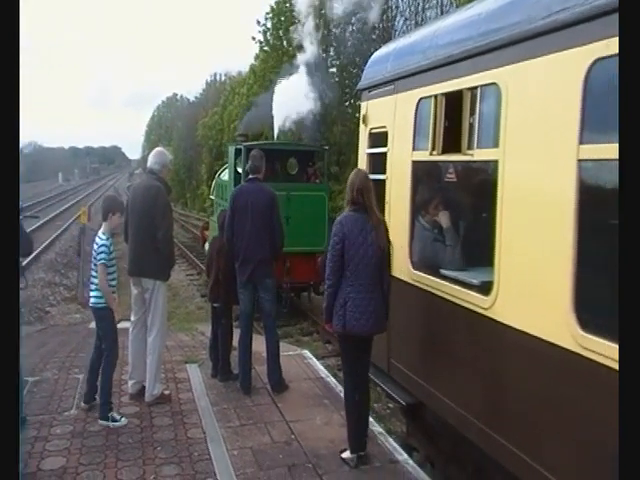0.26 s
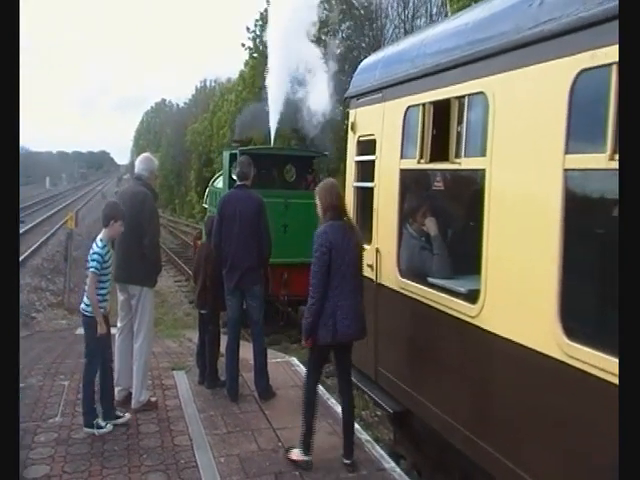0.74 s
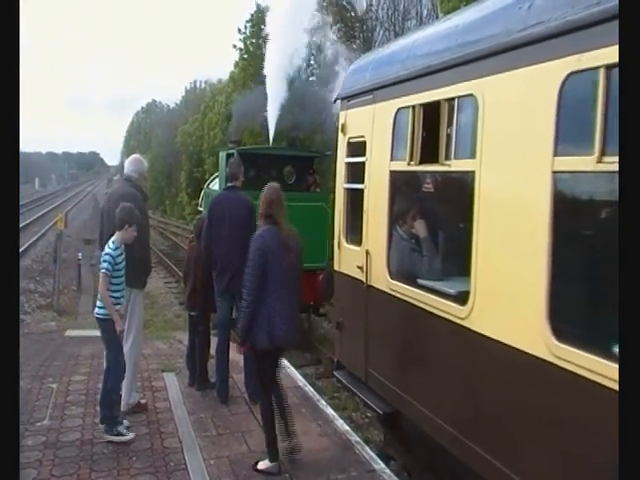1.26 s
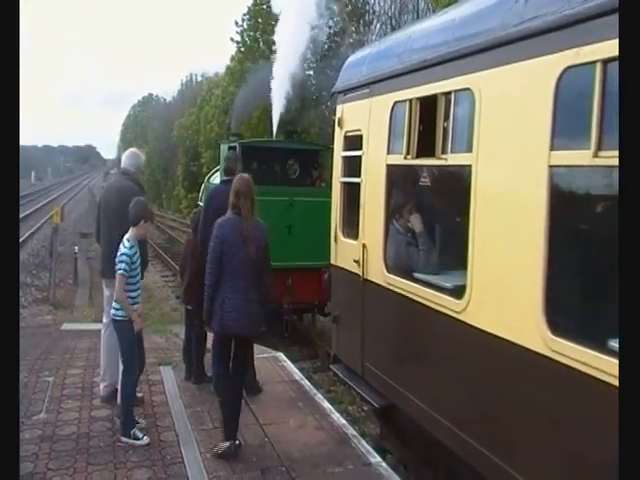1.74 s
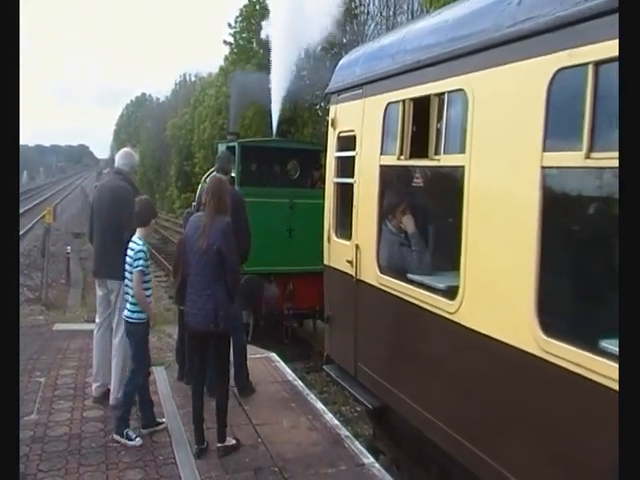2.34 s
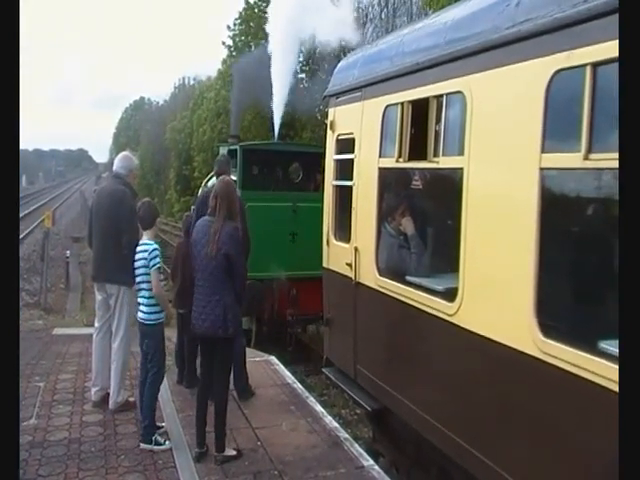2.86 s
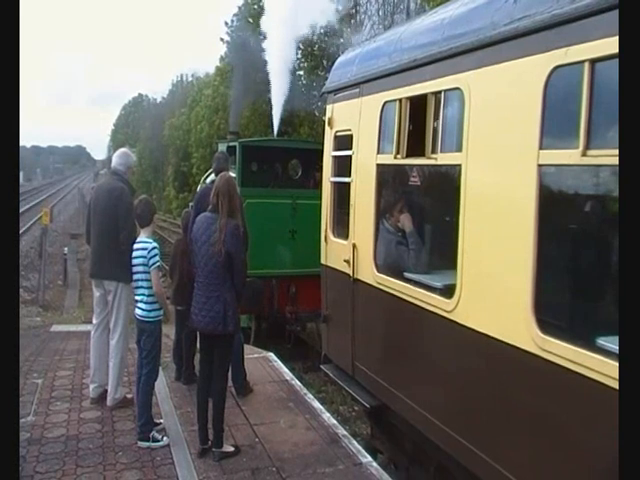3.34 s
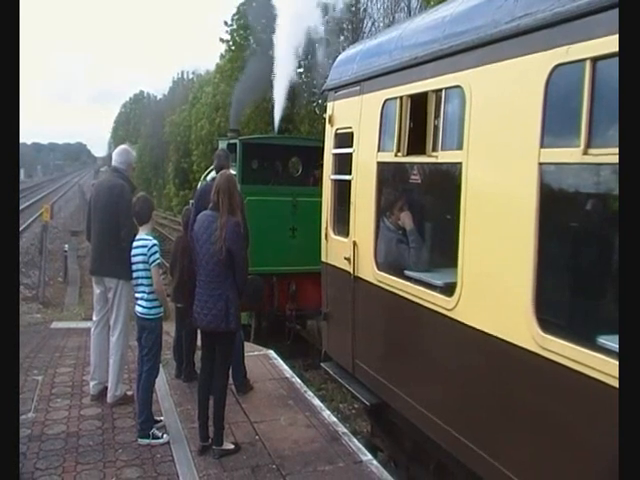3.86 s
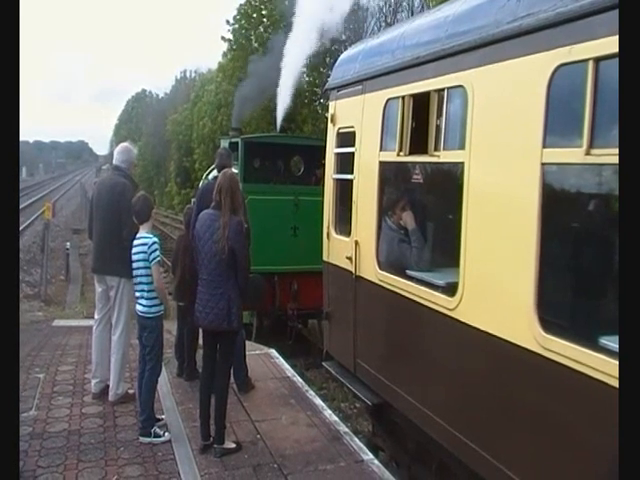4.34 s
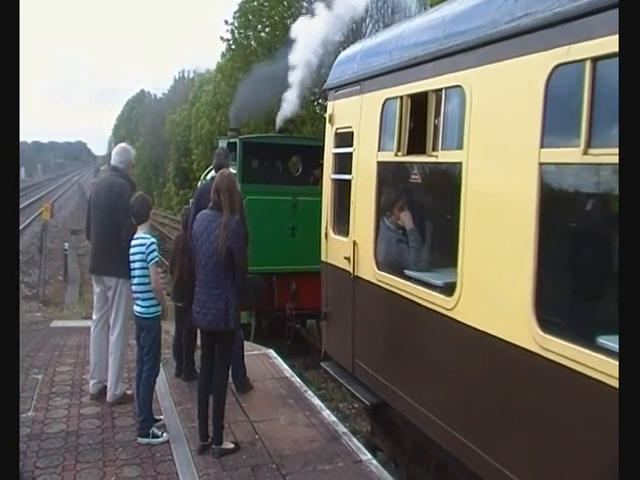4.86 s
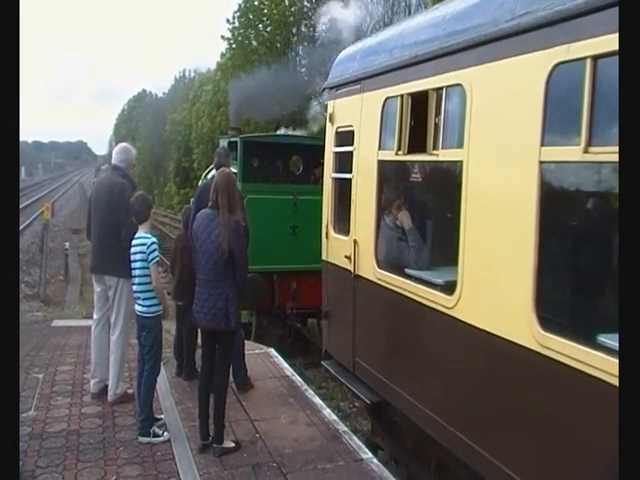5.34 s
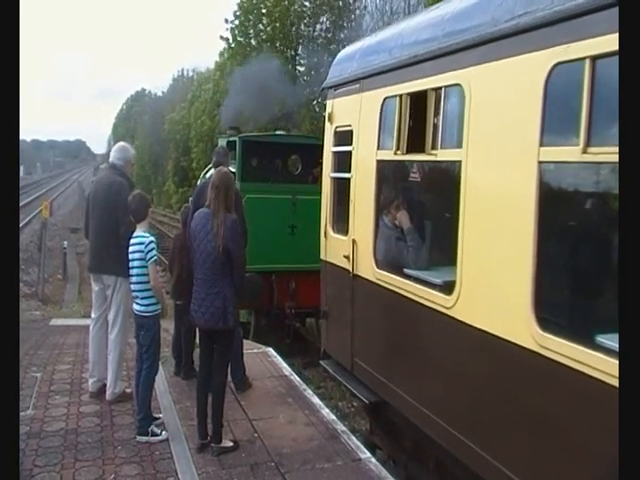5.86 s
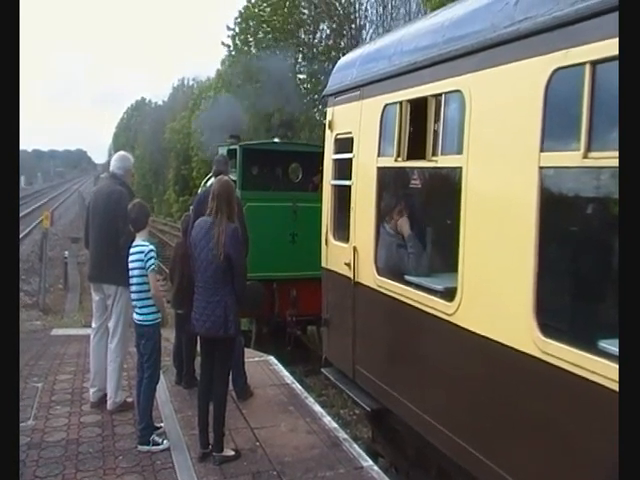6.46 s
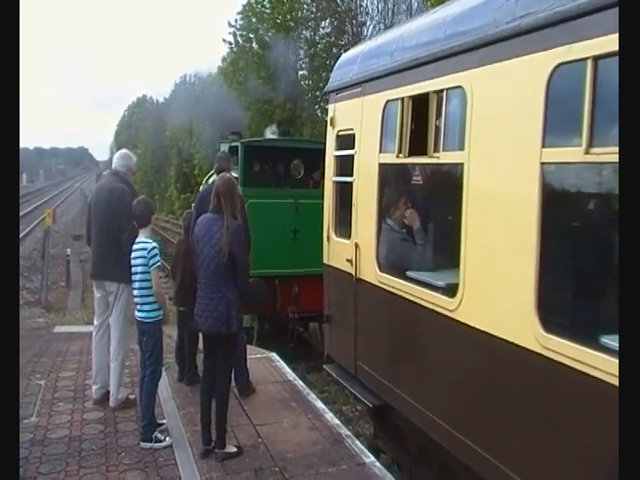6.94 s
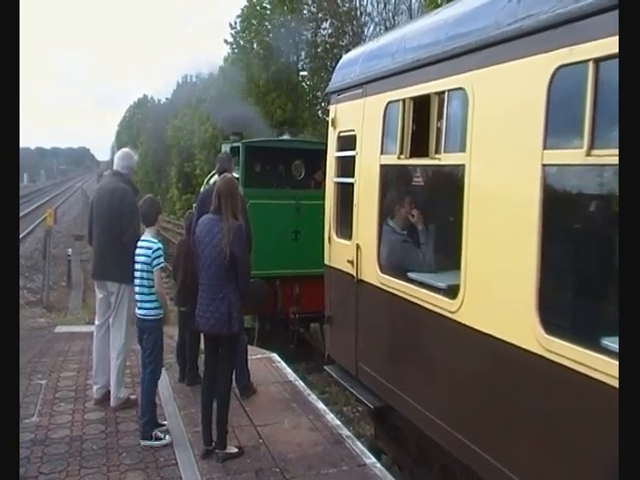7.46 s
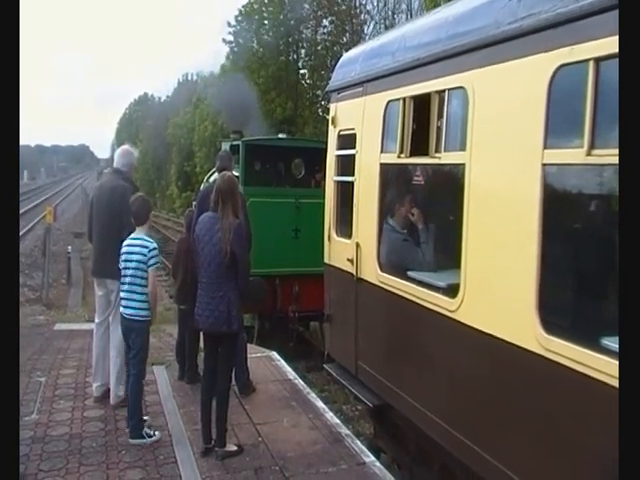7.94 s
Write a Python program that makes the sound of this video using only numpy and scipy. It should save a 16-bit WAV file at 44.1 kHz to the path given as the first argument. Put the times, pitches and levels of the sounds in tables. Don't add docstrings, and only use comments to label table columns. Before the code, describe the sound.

Loud steam escape hisses and sings for five seconds, cuts off with heavy low thumps, then deep rumbling, gusty wind and a faint leak hiss.

```python
import sys
import numpy as np
from scipy import signal
from scipy.io import wavfile
from scipy.ndimage import uniform_filter1d, map_coordinates

SR = 44100
rng = np.random.default_rng(int(sys.argv[2]) if len(sys.argv) > 2 else 0)


def boost_factor(decibels):
    exponent = np.asarray(decibels, float) / 20
    return 10 ** exponent


def dump_mix(stems):
    frames = np.atleast_2d(stems).T
    limited = np.clip(frames, -1, 1)
    pcm = np.round(limited * 32767).astype(np.int16)
    wavfile.write(sys.argv[1], SR, pcm)


N = 361163
TIME_S = np.arange(N) / SR
TREBLE_EDGES_HZ = 200 * 2 ** (np.arange(25) / 4)
RUSTLE_EDGES_HZ = 140 * 2 ** (np.arange(12) / 4)
BASS_EDGES_HZ = 11 * 2 ** (np.arange(16) / 3)


def rms_one(x):
    return x / np.sqrt(np.mean(x ** 2) + 1e-20)


def in_time(rows):
    s, *columns = np.transpose(rows)
    return [np.interp(TIME_S, s, column) for column in columns]


def at_hz(points, hz):
    point_hz, point_db = np.transpose(points)
    return np.interp(np.log(hz), np.log(point_hz), point_db)


def above(hz, edge_hz, octaves):
    return 1 / (1 + (edge_hz / hz) ** (4 / octaves))


def drift(rate):
    r = np.exp(-80 * np.pi * rate / SR)
    slow = signal.lfilter([1], [1, -2 * r, r * r], rng.standard_normal(N // 40 + 2002))
    slow = rms_one(slow[2000:])
    return np.interp(np.arange(N) / 40, np.arange(len(slow)), slow)


def late(x, lag_s):
    return map_coordinates(x, [np.arange(N) - lag_s * SR], order=3)


def wavering(hz, wander, rate):
    wandering_hz = hz * (1 + wander * drift(rate))
    return np.sqrt(2) * np.sin(2 * np.pi * np.cumsum(wandering_hz) / SR)


def narrow_noise(hz, width_hz):
    phase = 2 * np.pi * np.cumsum(hz * np.ones(N)) / SR
    return rms_one(drift(width_hz) * np.cos(phase) + drift(width_hz) * np.sin(phase))


def resonant_noise(hz, width_hz):
    band = signal.butter(2, [hz - width_hz / 2, hz + width_hz / 2], "band", fs=SR, output="sos")
    return rms_one(signal.sosfilt(band, rng.standard_normal(N)))


def ring(events, hz, t60):
    clicks = np.full(N, 1e-18)
    for s, level_db in events:
        clicks[round(s * SR)] = boost_factor(level_db)
    r, w = boost_factor(-60 / (t60 * SR)), 2 * np.pi * hz / SR
    return signal.lfilter([0, np.sin(w)], [1, -2 * r * np.cos(w), r * r], clicks)


def turbulence(mid_shape, side_shape, edges, moves, side_db, shared_db, slow_db, fast_db):
    mid_sum, side_sum = 0, 0
    white = rng.standard_normal((2, 2, N))
    together, near = drift(7.6), drift(3.3)
    for k, (low, high) in enumerate(zip(edges, edges[1:])):
        band = signal.butter(2, [low, high], "band", fs=SR, output="sos")
        mid, side = signal.sosfilt(band, white[k % 2])
        hz = np.sqrt(low * high)
        before, near = near, drift(1.64)
        flicker_db = shared_db * together + slow_db * (before + near) + fast_db * drift(38)
        flicker = boost_factor(moves(hz) + flicker_db)
        mid_sum = mid_sum + boost_factor(at_hz(mid_shape, hz)) * flicker * mid
        side_sum = side_sum + boost_factor(at_hz(side_shape, hz) + side_db) * flicker * side
    return np.array([mid_sum, side_sum]) / np.std(mid_sum)


# start_s, depth_db
DUCKS = [(5.02, 2), (5.115, 1), (5.5, 2), (5.77, 4.5), (5.95, -2), (6.5, -1.5), (6.85, 5.5), (6.93, 0)]


def ducking():
    attack_s, release_s = .045, .1
    dips_db = 0
    for s, depth_db in DUCKS:
        fall = np.clip((TIME_S - s) / attack_s + 1, 0, 1)
        dips_db = dips_db + depth_db * fall * np.exp(-np.maximum(TIME_S - s, 0) / release_s)
    return -dips_db


# pitch_hz, level_db (per Hz)
JET_MID = [(300, -41), (700, -41.5), (1200, -12.5), (1600, -7.5), (2000, -7.5), (3000, -5.5), (3800, 7),
           (4500, -4.5), (5200, 1.5), (5800, -6), (7000, -7.5), (9500, -13), (11000, -3.5), (12500, -28)]
JET_SIDE = [(300, -39.5), (700, -24.5), (1200, -13.5), (1600, -11), (2000, -12.5), (3000, -7), (3800, 3),
            (4500, -8.5), (5200, 4), (5800, 1), (7000, -0.5), (9500, -11), (11000, -12), (12500, -13)]


def jet(flow_db, lift_db):
    sizzle_db = -5 + lift_db
    roar_db = -11 + drift(14.0)

    def moves(hz):
        top = above(hz, 6840, 0.48) + 0.27 * above(hz, 12900, 0.8)
        return (sizzle_db + 9.5) * top + (roar_db + 12.0) * (1 - above(hz, 2350, 0.38))

    noise = turbulence(JET_MID, JET_SIDE, TREBLE_EDGES_HZ, moves, side_db=-8.0, shared_db=1.23,
                       slow_db=0.1, fast_db=0.86)
    return boost_factor(flow_db - 3.0 + ducking()) * noise


# start_s, pitch_hz, level_db
WHISTLE = [(0, 2500, -80), (.5, 2760, -30), (.72, 3200, -30), (.92, 3230, -22), (1.1, 3250, -15),
           (1.3, 3106, -23), (1.6, 2984, -29), (2.05, 2862, -24.5), (2.27, 2950, -42), (2.31, 3070, -16.5),
           (2.36, 3235, -17), (2.52, 3315, -16.5), (3.08, 3126, -23), (3.3, 2880, -27), (4.06, 2930, -25),
           (4.3, 2765, -26.5), (4.88, 2800, -29), (5.0, 2770, -99)]
# start_s, pitch_hz, level_db
OPENING = [(0, 4210, -27), (.13, 4220, -27), (.3, 4490, -39), (.45, 4140, -90)]
# start_s, pitch_hz, level_db
UPPER = [(.1, 5000, -87), (.25, 5020, -28.5), (.55, 4760, -38), (.8, 4520, -32), (1.0, 4500, -60),
         (2.5, 4600, -46), (3.2, 4600, -35), (4.1, 4560, -36), (4.8, 4600, -37), (5.0, 4600, -87)]


def whistle():
    pitch_hz, level_db = in_time(WHISTLE)
    broken = np.clip((3050 - pitch_hz) / 150, 0, 1)   # share, rising over 150 Hz below 3050 Hz
    wander = .011 + .035 * broken
    clear = wavering(pitch_hz, wander, rate=60.6)
    breathy = narrow_noise(pitch_hz, width_hz=70)
    tone = boost_factor(level_db - 4.5) * (0.75 * clear + 0.4 * breathy)
    for strand_hz, strand_db in (in_time(OPENING), in_time(UPPER)):
        tone += boost_factor(strand_db - 1.0) * narrow_noise(strand_hz, width_hz=70)
    return tone * boost_factor([[0], [-12.0]])


# pitch_hz, width_hz, level_db
COLUMN = [(1831, 155, -8), (2375, 177, -4), (2900, 270, 1.5), (4600, 2300, 2)]


def howl(flow_db, lift_db):
    from_s, rise_db_per_s = 0.53, 50
    until_s, fall_db_per_s = 4.89, 38
    level_db = flow_db - 7.5 - 0.97 * lift_db
    level_db = level_db - rise_db_per_s * np.maximum(from_s - TIME_S, 0)
    level_db = level_db - fall_db_per_s * np.maximum(TIME_S - until_s, 0)
    modes = sum(boost_factor(mode_db + 1.24 * drift(13.5)) * resonant_noise(hz, width_hz)
                for hz, width_hz, mode_db in COLUMN)
    return boost_factor(level_db - 7.0) * modes * boost_factor([[0], [-15.0]])


# start_s, flow_db, lift_db (lift of the disc as extra sizzle)
VALVE = [(0, -17.5, -6), (.33, -17, -5), (.45, -17.5, -1), (.7, -17.5, 3.5), (1.2, -20, 1.5),
         (1.55, -17.5, -0.5), (2.2, -17, -1), (2.4, -19.5, 2.5), (3.86, -17.5, 1.5), (3.98, -20.5, -0.5),
         (4.05, -17.5, 0.5), (4.6, -19.5, -3), (4.85, -18.5, -4), (4.93, -22, -3), (5.08, -28, -7),
         (5.17, -29.5, -3), (5.27, -51, 4), (5.5, -59, 7)]
# start_s, delay_ms
ECHO = [(0, 2.3), (.35, 2.25), (.6, 1.96)]


def valve():
    flow_db, lift_db = in_time(VALVE)
    steam = jet(flow_db, lift_db) + whistle() + howl(flow_db, lift_db)
    dull = signal.sosfilt(signal.butter(2, 3400, fs=SR, output="sos"), steam[0])
    delay_s = in_time(ECHO)[0] / 1000
    steam[0] -= boost_factor(-16.5) * late(dull, delay_s)
    return steam


# pitch_hz, level_db (per Hz)
LEAK_MID = [(250, -15.5), (400, -5), (700, -4), (1100, 0.5), (1800, -8), (3000, -15), (4500, -14.5),
            (6000, -24.5), (8000, -23.5), (10000, -25.5), (12500, -29.5)]
LEAK_SIDE = [(250, -14), (400, 0.5), (700, 0.5), (1100, 7.5), (1800, 4), (3000, -1), (4500, -3.5),
             (6000, -4), (8000, -6), (10000, -12), (12500, -12)]
# start_s, level_db
PUFFS = [(5.17, 5), (5.66, 8), (6.2, 2), (6.6, 4), (6.98, 9.5), (7.25, 7.5), (7.53, 6), (7.8, 11),
         (8.1, 7.5)]


def leak():
    level_db = -43.5 + ducking()
    puff_s = 0.08
    top_db = -6.5 + sum(puff_db * np.exp(-((TIME_S - s) / puff_s) ** 2) for s, puff_db in PUFFS)

    def moves(hz):
        return (level_db + 48.0) * above(hz, 1400, 2.1) + (top_db + 16.0) * above(hz, 6300, 1.67)

    hiss = turbulence(LEAK_MID, LEAK_SIDE, TREBLE_EDGES_HZ, moves, side_db=-19.0, shared_db=.5,
                      slow_db=0.13, fast_db=1.0)
    thin_whistle = boost_factor(level_db - 8.5) * narrow_noise(3230, width_hz=110)
    return boost_factor(-39.5) * hiss + thin_whistle * boost_factor([[0], [-8.0]])


# start_s, draught_db (as drum level), second_db (second mode re drum)
DRUM = [(0, -28.5, 4.5), (.4, -31, -0.5), (.95, -36, 9), (1.2, -40.5, -4.5), (1.7, -24.5, -11),
        (2.0, -24, -6.5), (2.5, -38, -8), (3.4, -28, -15), (4.25, -32.5, 3), (4.45, -23.5, -5.5),
        (4.75, -33, 0), (5.1, -18, 1.5), (5.45, -16.5, -5), (6.05, -10.5, -13), (6.85, -12, -5.5),
        (7.05, -15, 2), (7.6, -21.5, -3), (8.19, -32.5, 6.5)]
# start_s, level_db
FLUE_OVERTONE = [(5.0, -77), (6.2, -42), (6.7, -46), (8.19, -52)]


def fire():
    drum_db, second_db = in_time(DRUM)
    pitch_hz = 39.8 - .06 * np.maximum(drum_db + 30, 0)
    boom_db = drum_db + second_db + 2.5 * drift(5.0)
    drum_db = drum_db + 0.21 * np.clip(-6 - drum_db, 0, 15) * drift(5.0)
    drum = boost_factor(drum_db + 0.76 * drift(3.4)) * wavering(pitch_hz, wander=0.0174, rate=3.3)
    boom = boost_factor(boom_db - 1.0 + 1.26 * drift(10.5)) * wavering(54, wander=.05, rate=4.97)

    shut_s, recover_s = 5.0, 0.67
    valve_open = np.clip((shut_s - TIME_S) / recover_s, 0, 1)
    hum_db = -28 - 15 * valve_open + 4 * np.minimum(drift(5.0), .5) * 1.8
    hum = boost_factor(hum_db - 1.4 + 2.0 * drift(9.3)) * wavering(160, wander=0.0325, rate=12.23)
    hum += boost_factor(hum_db - 4) * narrow_noise(78, width_hz=2.8)
    hum += boost_factor(in_time(FLUE_OVERTONE)[0]) * narrow_noise(355, width_hz=13.0)
    return drum + boom + hum


# start_s, gust_db, head_on_db (rustle re gust)
WIND = [(0, -29.5, 3.5), (.14, -30, 5.5), (.24, -24, -3), (.33, -28.5, 8), (.52, -27.5, 4), (.7, -31, 1),
        (1.2, -38, 2), (2.14, -32.5, -1.5), (2.3, -43, 1), (2.6, -45.5, -2.5), (3.24, -35.5, -10),
        (3.6, -45.5, -15), (4.15, -39, -11), (4.45, -29.5, -29), (4.95, -35, -5.5), (5.1, -28.5, -2.5),
        (7.75, -33, 0), (8.1, -25, -9)]
# pitch_hz, level_db (per Hz)
GUST = [(12, 1), (25, 3.5), (45, -7), (80, -6), (105, -6.5), (130, -9), (200, -21.5), (300, -35)]
RUSTLE = [(150, 0.5), (215, -3.5), (270, -5.5), (400, -9), (550, -9), (700, -21), (900, -12.5)]
# start_s, level_db (re rustle)
PORT_RING = [(0, -2), (1.4, 1.5), (2.6, 2), (3.2, -24), (8.19, -10)]


def wind():
    gust_db, head_on_db = in_time(WIND)
    rustle_db = gust_db + head_on_db + 1.9 * drift(6.8)
    gust_db = gust_db + 2 * drift(3.9)
    rumble = turbulence(GUST, GUST, BASS_EDGES_HZ, lambda hz: 0, side_db=0.0, shared_db=-1.0,
                        slow_db=0.4, fast_db=1.0)
    rustle = turbulence(RUSTLE, RUSTLE, RUSTLE_EDGES_HZ, lambda hz: 0, side_db=-13, shared_db=0.5,
                        slow_db=1.2, fast_db=0.5)
    rustle[0] += boost_factor(in_time(PORT_RING)[0]) * resonant_noise(209.7, width_hz=31)
    return boost_factor(gust_db + 5.0) * rumble + boost_factor(rustle_db - 5.0) * rustle


# start_s, level_db (peak), pitch_hz (ring)
BUMPS = [
    (.15, -13, 150),
    (.47, -9.5, 130),
    (4.42, -12, 70.4),
    (5.0, 1.5, 77),
    (5.106, -1, 81),
    (5.515, 1.5, 61),
    (5.735, -0.5, 61.6),
    (6.516, -4.5, 110),
    (6.838, -12.5, 61.8),
]


def bumps():
    pushes = sum(ring([(s, level_db - 2.0)], hz, t60=0.063) for s, level_db, hz in BUMPS)
    soft = signal.butter(4, 280, fs=SR, output="sos")
    return signal.sosfilt(soft, pushes) * boost_factor([[0], [-4.0]])


# start_s, level_db (peak)
TICKS = [
    (7.808, -18),
    (7.811, -25),
]


def stone():
    return ring(TICKS, 2020, t60=0.0053) * [[1], [0]]


def scene():
    lows = wind() + bumps() + fire() * boost_factor([[0], [-5.0]])
    mid, side = valve() + leak() + boost_factor(-5.0) * lows + stone()
    return np.array([mid + side, mid - side])


def thin_side(mid, side):
    hz, _, both = signal.stft([mid, side], SR, nperseg=2048)
    bands = both[:, :1024].reshape(2, 128, 8, -1)
    power = np.sum(np.abs(bands) ** 2, axis=2)
    masked = uniform_filter1d(power[0], size=3, axis=0) * boost_factor(2 * -21)
    heard = (power[1] > masked) | (hz[:1024:8, None] < 150)
    both[1, :1024] *= np.repeat(heard, 8, axis=0) * (hz[:1024, None] < 11750)
    return signal.istft(both[1], SR, nperseg=2048)[1][:N]


def top_cut(x):
    return signal.sosfilt(signal.butter(12, 12110, fs=SR, output="sos"), x)


def record(dry):
    left, right = 1.379 * np.tanh(dry / 1.22)
    mid, side = (left + right) / 2, (left - right) / 2
    widen_s, limit = 1 / 2400, .9
    mid = mid + .8 * late(mid, widen_s)
    mid = mid / (1 + np.abs(mid / limit) ** 8) ** (1 / 8)
    side = thin_side(mid, side - .92 * late(side, widen_s))
    steep = signal.ellip(12, .5, 55, 11990, fs=SR, output="sos")
    mix = signal.sosfilt(steep, [mid + side, mid - side])
    return top_cut(mix)


dry = scene()
out = record(dry)
dump_mix(out)
```